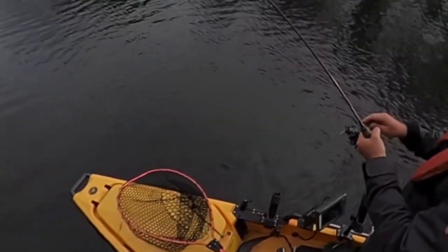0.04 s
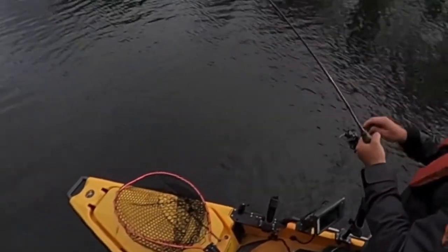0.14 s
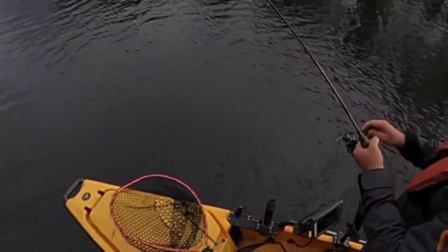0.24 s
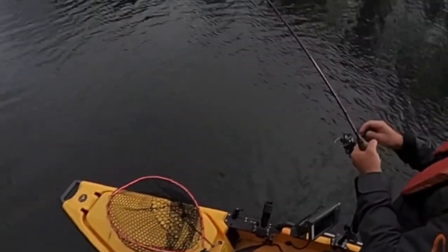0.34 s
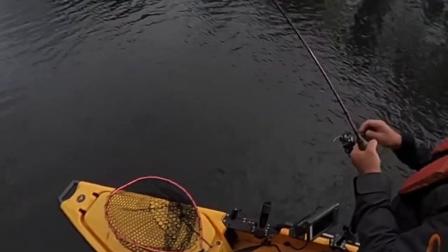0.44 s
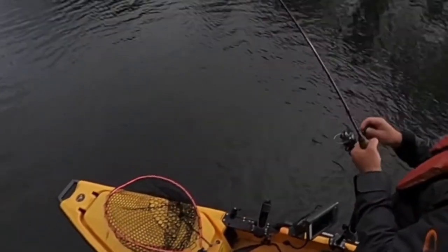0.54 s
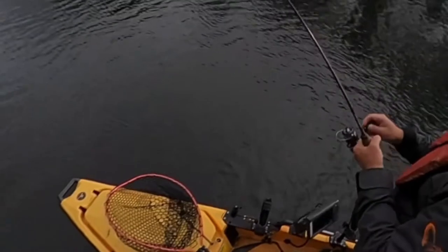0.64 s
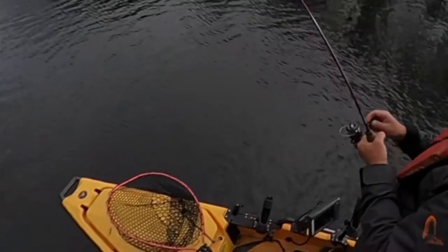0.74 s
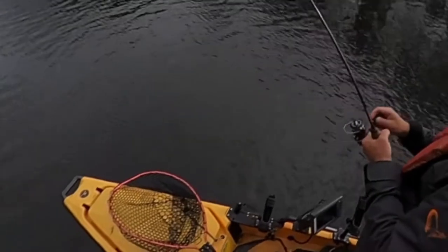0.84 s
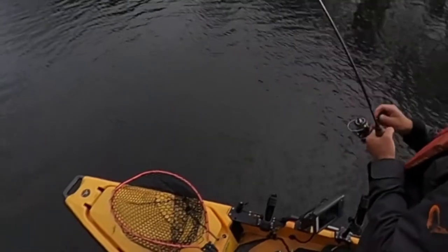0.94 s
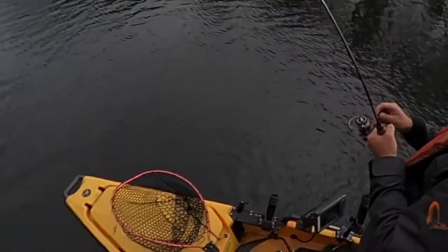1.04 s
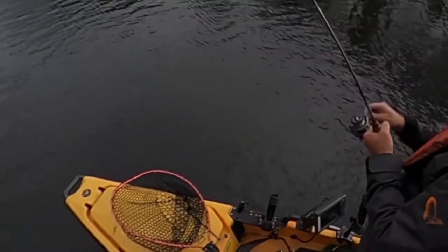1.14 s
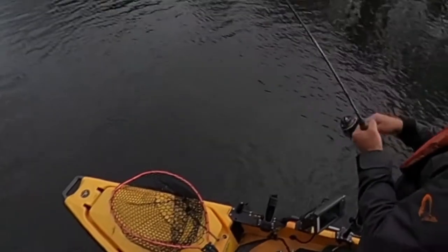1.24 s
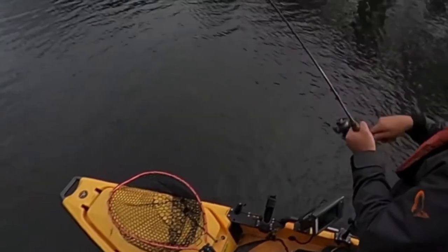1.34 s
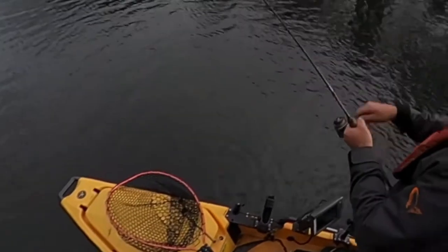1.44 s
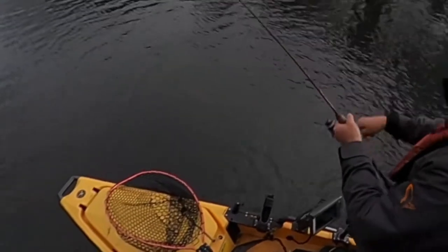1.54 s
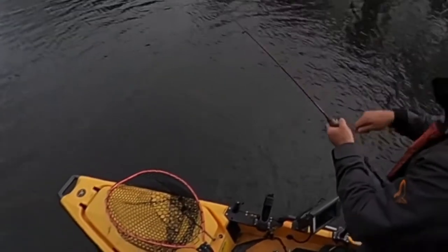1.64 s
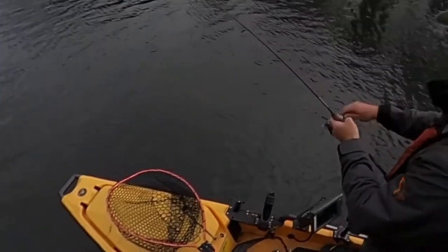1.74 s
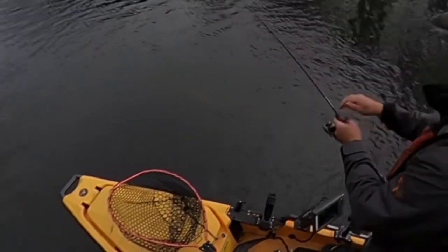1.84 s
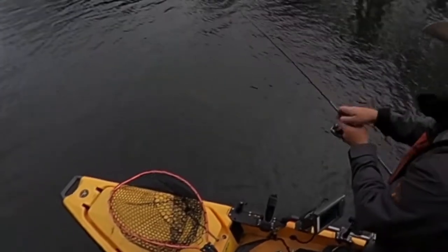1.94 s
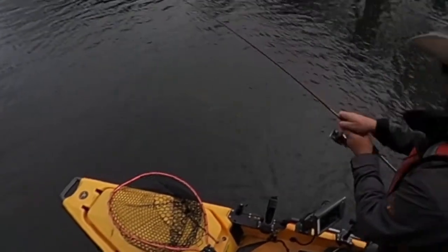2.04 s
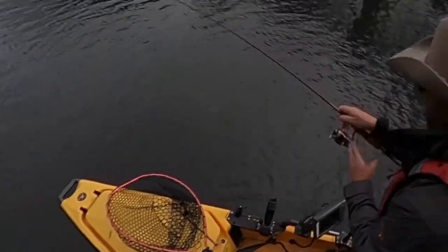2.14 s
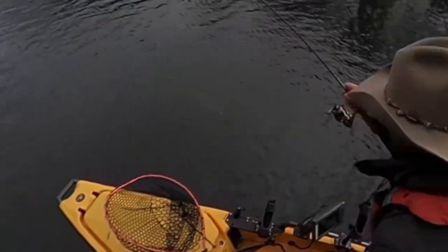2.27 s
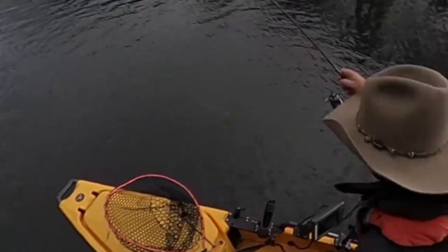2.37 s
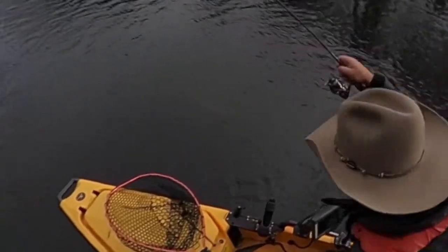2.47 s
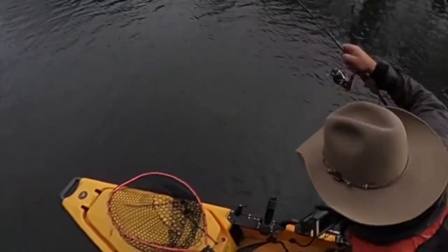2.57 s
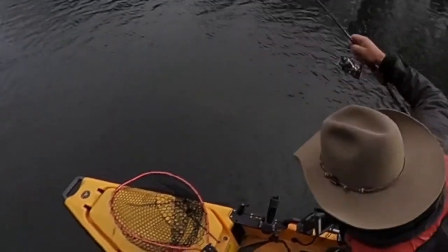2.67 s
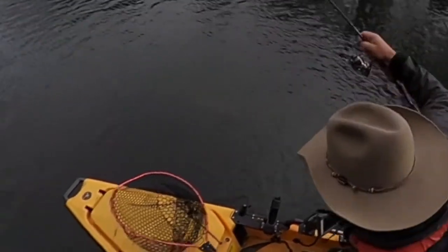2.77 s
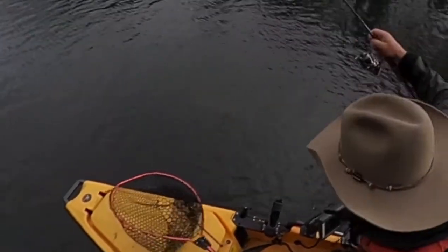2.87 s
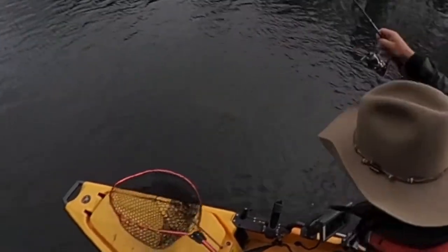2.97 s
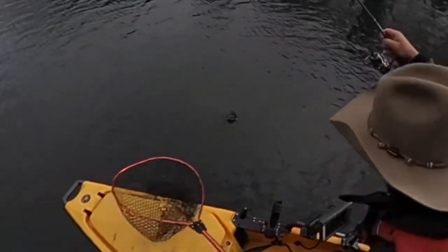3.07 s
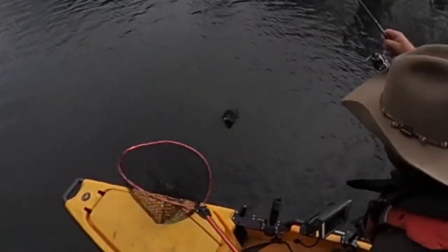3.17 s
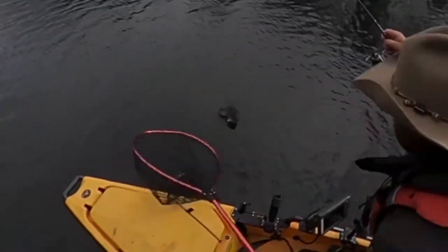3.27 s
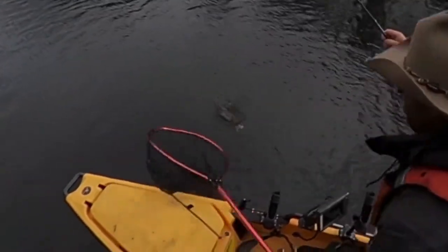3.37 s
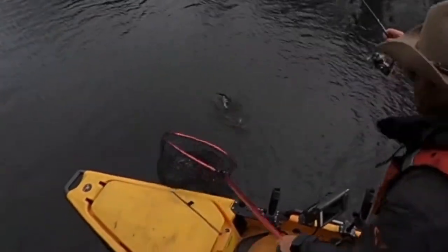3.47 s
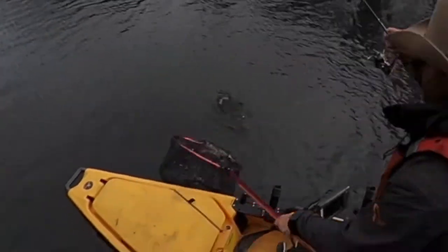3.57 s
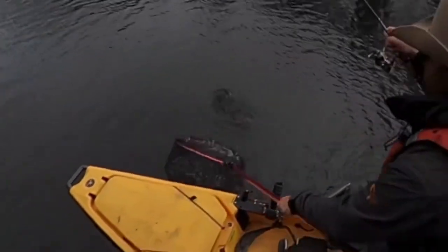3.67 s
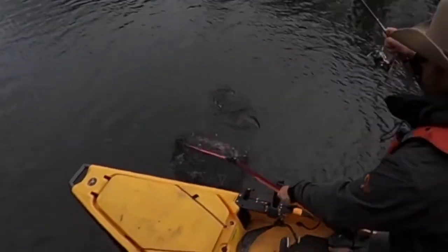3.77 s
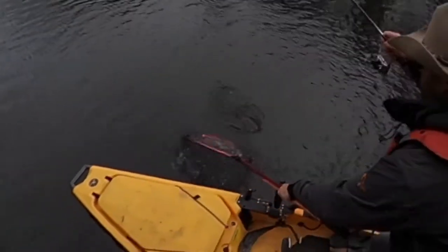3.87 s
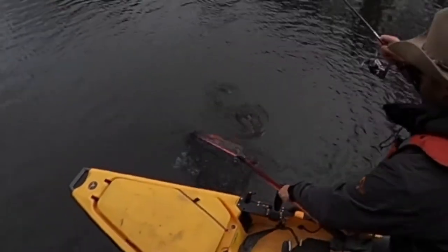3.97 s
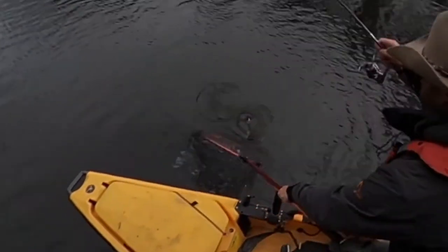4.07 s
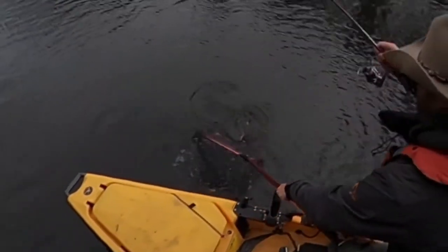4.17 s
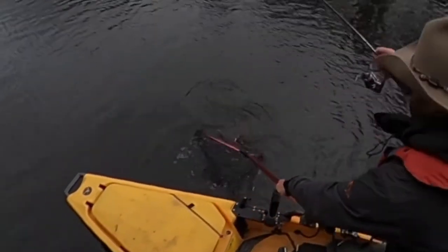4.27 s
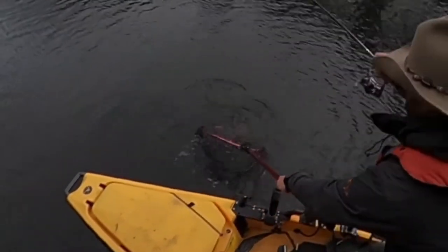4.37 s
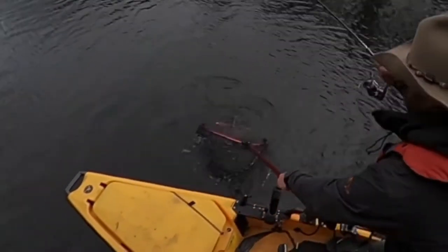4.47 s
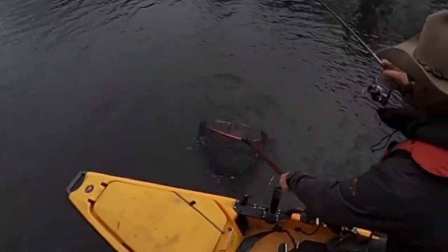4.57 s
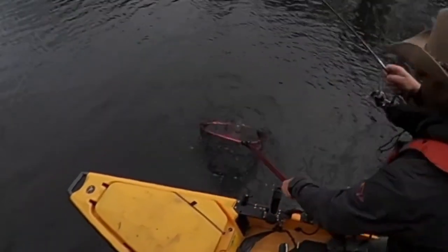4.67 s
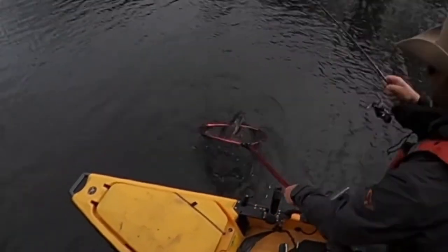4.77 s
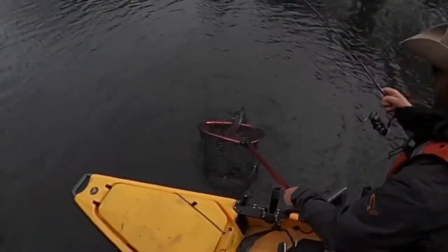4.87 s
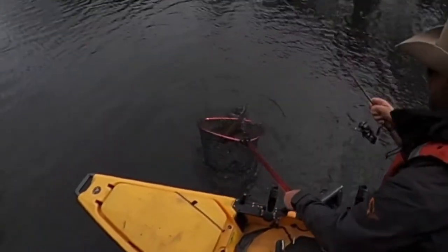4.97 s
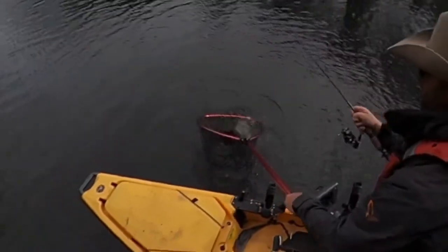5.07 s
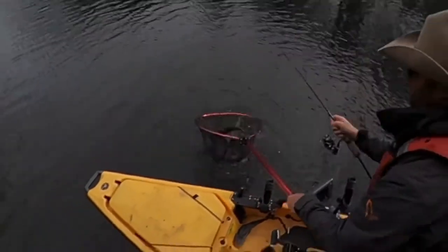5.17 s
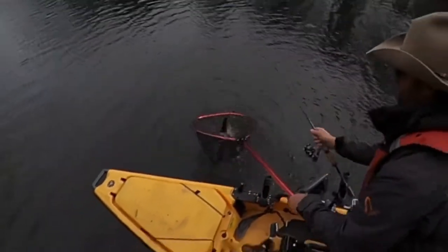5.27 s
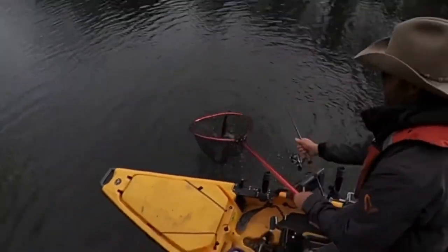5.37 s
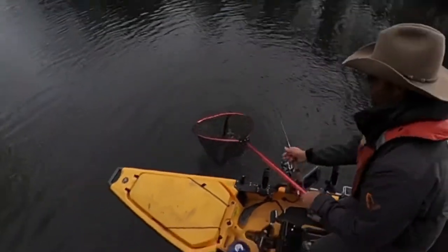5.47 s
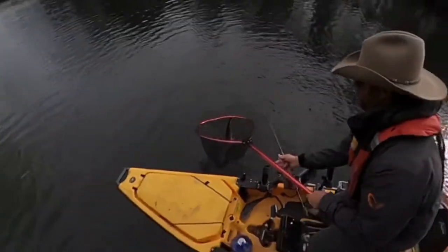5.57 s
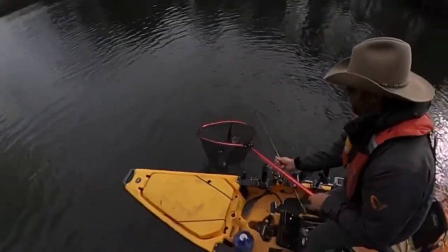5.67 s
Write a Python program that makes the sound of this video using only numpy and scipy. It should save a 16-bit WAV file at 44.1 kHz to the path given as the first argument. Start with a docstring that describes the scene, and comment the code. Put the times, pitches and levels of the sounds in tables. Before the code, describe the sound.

Quiet low rumble and faint reel ticks on calm water, then hollow hull knocks, wet splashes and dripping as a fish is netted from a kayak.

```python
"""On calm open water, an angler in a plastic kayak lands a fish. Knocks, mostly of the landing net on the
hollow hull, ring as fading tones and noise bursts, among low soft booms, bumps and gulps.
Splashes and drips are swarms of ringing air bubbles. The reel ticks with tiny noise bursts, and the taut
line sings in thin bands of noise. Air and the rocking boat rumble in a microphone mounted on the kayak."""
import sys
import numpy as np
from scipy import signal
from scipy.fft import rfft, irfft, next_fast_len
from scipy.io import wavfile
from scipy.ndimage import uniform_filter1d, map_coordinates

SR = 44100
rng = np.random.default_rng(int(sys.argv[2]) if len(sys.argv) > 2 else 0)


def unload_audio(sound):
    """Save the sound as a 16-bit wav file, at the path given as the first command line argument."""
    columns = np.transpose(np.atleast_2d(sound))
    # keep every value between -1 and 1, then stretch to whole-number steps
    steps = np.round(np.clip(columns, -1, 1) * 32767)
    wavfile.write(sys.argv[1], SR, steps.astype(np.int16))


N = 252252  # length in samples


def amp(db):
    """Turn decibels into a gain."""
    return 10 ** (np.asarray(db) / 20)


def unit(x):
    """Scale a sound to an rms (average strength) of 1."""
    return x / np.sqrt(np.mean(x ** 2) + 1e-20)


def clock(length):
    """Sample times over a length in seconds."""
    return np.arange(int(length * SR)) / SR


def curves(rows):
    """Join table rows with straight lines: one curve for each column after the time."""
    s, *columns = np.transpose(rows)
    return [np.interp(np.arange(N) / SR, s, column) for column in columns]


def wobble(rate):
    """A smooth random curve through a given number of random points a second."""
    points = rng.standard_normal(int(N * rate / SR) + 4)
    return map_coordinates(points, [np.arange(N) * rate / SR])


def add(track, s, sound):
    """Mix a sound into a track from time s."""
    start = int(np.clip(round(s * SR), 0, N - 1))
    track[start:start + len(sound)] += sound[:N - start]


def swell(s, rise_s, t60):
    """An envelope that grows to 1 at time s, then falls 60 dB in t60 seconds."""
    t = np.arange(N) / SR - s
    return np.exp(np.minimum(t, 0) / rise_s) * amp(-60 * np.maximum(t, 0) / t60)


def colour(x, points):
    """Filter a sound to follow (Hz, dB) points, without any sound before its start."""
    size = 2 * next_fast_len(len(x) // 2 + 4096)
    hz, db = np.transpose(points)
    gain = amp(np.interp(np.log(np.fft.rfftfreq(size, 1 / SR) + 1), np.log(hz), db))
    # Folding the cepstrum gives the filter minimum phase: it acts as early as it can.
    cepstrum = irfft(np.log(gain + 1e-6))
    cepstrum[1:size // 2] *= 2
    cepstrum[size // 2 + 1:] = 0
    response = np.exp(rfft(cepstrum))
    return irfft(rfft(x, size) * response)[:len(x)]


def noise(points):
    """Steady coloured noise of rms 1."""
    return unit(colour(rng.standard_normal(N), points))


def narrow(hz, width_hz):
    """A band of noise round a moving centre, rms 1."""
    phase = 2 * np.pi * np.cumsum(hz) / SR
    return unit(wobble(width_hz) * np.cos(phase) + wobble(width_hz) * np.sin(phase))


def patchy(x, patchy_db):
    """Give a rush patches of random strength in time and pitch, rms 1."""
    z = signal.stft(x, nperseg=512)[2]
    field = uniform_filter1d(rng.standard_normal(z.shape), size=7, axis=0)  # smooth over pitch
    field = uniform_filter1d(field, size=6, axis=1)  # smooth over time
    patched = z * amp(patchy_db * unit(field))
    return unit(signal.istft(patched, nperseg=512)[1][:N])


def bubble(t, hz, cycles, rise):
    """A pocket of air rings and fades 60 dB in some cycles, its pitch rising as it nears the surface."""
    age = t * hz / cycles
    tone = np.sin(2 * np.pi * hz * t * (1 + rise * np.minimum(age, 2) / 2))
    return tone * amp(-60 * age) * (1 - np.exp(-t * hz))


def swarm(low_hz, high_hz, cycles, spread_db, count):
    """Many bubbles of random time, pitch and strength, rms 1."""
    when, pitch, size = rng.random((count, 3)).T[:, :, None]
    hz = low_hz * (high_hz / low_hz) ** pitch
    t = clock(cycles / low_hz)
    strength = amp(-spread_db * np.log(size + .02))  # a few bubbles stand out
    grains = strength * bubble(t, hz, cycles, rise=.25)
    places = (when * N).astype(int) + np.arange(len(t))
    return unit(np.bincount(places.ravel(), grains.ravel(), N)[:N])


def ring(modes, t, vary_db):
    """A struck part sounds its own fading tones at slightly random strengths, peak 1."""
    hz, db, t60 = np.transpose(modes)[:, :, None]
    chance = rng.standard_normal((len(modes), 2))
    strength = amp(db + vary_db * chance[:, :1] - 60 * t / t60)
    x = np.sum(strength * np.sin(2 * np.pi * hz * t + 2 * chance[:, 1:]), 0)
    x *= 1 - np.exp(-2 * t * hz.mean())  # soften the first instant
    return x / np.abs(x).max()


# Tones of each struck part: (frequency [Hz], relative level [dB], time to fade 60 dB [s])
HULL_TONES = [(155, -17, 0.18), (211, -9.5, 0.55), (270, -13, 0.2), (354.5, 0, 0.21), (430, -19, 0.19),
              (575, 3.5, 0.093), (720, -3.5, 0.092)]
DECK_TONES = [(794, -0.5, 0.029), (937, -10, 0.13), (1022, 4.5, 0.067), (1120, 8, 0.026), (1318, -6, 0.073),
              (1900, -20, 0.048), (2150, -17.5, 0.034)]
FRAME_TONES = [(1550, -6, .025), (1800, -6, .025), (2350, -3, .02), (2650, -4, .007), (3185, -4, .018),
               (3950, -13, .02), (5360, 1, .02), (5500, 2.5, .005), (6280, -7, .015)]
# Colour of a hard contact: (frequency [Hz], relative level [dB])
CRACK_COLOUR = [(150, -18), (600, -40.5), (2500, 9), (5500, 0.5), (7500, -0.5), (10000, -16.5),
                (15000, -53.5)]
# Knocks on the kayak, and one light high click of reel or rod at 1.98 s, by how hard each set of tones
# is rung: (time [s], hull relative level [dB], deck relative level [dB], frame relative level [dB])
KNOCKS = [(1.98, -71, -84, -45), (2.889, -41, -23.5, -40), (2.8953, -68, -35, -58),
          (3.0068, -40, -22.5, -40), (3.423, -30, -31.5, -48), (3.994, -28, -30, -17),
          (4.013, -33, -44, -26.5), (4.738, -46, -57, -49)]


def knocks():
    """Knocks on the kayak and one light click: a hard crack with ringing frame, deck and hull tones."""
    out, t = np.zeros(N), clock(.5)
    clatter_colour = [(300, 8.5), (1250, 7.5), (3000, -5.0), (6000, -29.5), (14000, -68)]
    thud_colour = [(80, -12), (200, -6), (400, -4), (800, -13), (2000, -50), (6000, -110)]
    for s, hull_db, deck_db, frame_db in KNOCKS:
        # a sharp burst with a weaker, longer tail
        contact = rng.standard_normal(len(t)) * (amp(-60 * t / 0.0047) + amp(-11 - 60 * t / 0.04))
        frame = 0.85 * ring(FRAME_TONES, t, vary_db=1.5) + 0.85 * colour(contact, CRACK_COLOUR)
        rattle = rng.standard_normal(len(t)) * (amp(-60 * t / 0.043) + amp(-21.5 - 60 * t / .5))
        deck = .75 * ring(DECK_TONES, t, vary_db=1.5) + .6 * colour(rattle, clatter_colour)
        thud = colour(rng.standard_normal(len(t)) * amp(-60 * t / .2), thud_colour)
        hull = ring(HULL_TONES, t, vary_db=1.5) + 1.1 * thud
        add(out, s, amp(hull_db) * hull + amp(deck_db) * deck + amp(frame_db) * frame)
    return out


SWELL_S = 0.012  # width of the smooth rise before each crest
# Low soft booms that swell and fade:
# (time of the crest [s], level [dB], frequency [Hz], time to fade 60 dB [s])
BOOMS = [(1.091, -39.5, 39, 0.13), (2.085, -35.5, 49, .19), (2.668, -18, 44, 0.055),
         (2.766, -33, 95.5, 0.095), (2.838, -29, 84.4, 0.11), (2.913, -33, 88.1, 1),
         (3.053, -19.5, 70, 0.3), (3.411, -25.5, 115.7, 0.27), (3.445, -24, 113.7, .16),
         (4.028, -24, 64.6, 0.36), (4.803, -38, 78, 0.3), (5.214, -34, 29.3, 1)]


def booms():
    """Low soft booms: each is one deep tone that swells to a crest and fades."""
    out = np.zeros(N)
    for s, db, hz, t60 in BOOMS:
        t = clock(1) - .2  # the crest is at 0
        rise = np.exp(-(t / SWELL_S) ** 2 / 2)
        fall = amp(-60 * (np.hypot(t, .005) - .005) / t60)  # rounded at the crest
        shape = np.where(t < 0, rise, fall)
        add(out, s + t[0], amp(db) * shape * np.cos(2 * np.pi * hz * t))
    return out


# Soft low bumps and gulps at the hull: (time [s], relative level [dB], middle frequency [Hz])
BUMPS_AND_GULPS = [(.936, -51.5, 586), (2.079, -46, 213), (2.32, -38.5, 501), (2.591, -33, 222),
                   (2.79, -41, 271), (2.9, -26, 212), (3.05, -38, 223), (3.382, -33, 274),
                   (3.434, -28.5, 262), (3.495, -30.5, 1120), (3.885, -41, 650), (4.035, -36.5, 467),
                   (4.683, -37, 249), (4.735, -34, 418), (4.768, -41, 247), (4.94, -45, 580),
                   (5.134, -36.5, 339), (5.521, -42, 196)]


def bumps_and_gulps():
    """Soft low bumps and gulps at the hull: a dull noise burst with a cluster of short low tones."""
    out, t = np.zeros(N), clock(.2)
    for s, db, hz in BUMPS_AND_GULPS:
        push = rng.standard_normal(len(t)) * (1 - np.exp(-t / 0.0035)) * amp(-60 * t / 0.063)
        dull_colour = [(hz / 4, -14), (hz / 2.8, -3), (hz, 0), (hz * 1.33, -9), (hz * 4, -45),
                       (hz * 12, -100)]
        burst = colour(push, dull_colour)
        add(out, s, 0.44 * amp(db) * burst / np.abs(burst).max())
        for k, (delay, pitch) in enumerate(rng.random((4, 2))):  # each tone is weaker than the last
            tone = bubble(t, hz * 1.5 ** (pitch - .5), cycles=23.0, rise=0.022)
            add(out, s + .009 * k * (1 + delay / 2), amp(db - 3.5 - 2.66 * k) * tone)
    return out


# Colours of fine spray and coarser slosh: (frequency [Hz], relative level [dB])
SPRAY_COLOUR = [(880, -19.5), (1500, -2), (2050, 2), (2830, 1), (3760, -2), (5150, 2), (8000, -0.5),
                (10700, -17.5), (14400, -26), (15600, -26)]
SLOSH_COLOUR = [(150, 5.5), (350, -6.5), (700, -4.5), (1300, 6), (1800, 1), (2600, -17), (5000, -73)]
# Surges of thrown water: (time of the crest [s], spray relative level [dB], slosh relative level [dB],
# mist level relative to the spray column [dB], rise time [s], time to fade 60 dB [s])
SURGES = [(3.514, -43, -44.5, -35, 0.015, 0.99), (3.604, -39.5, -40.5, -27, 0.077, 0.24),
          (3.689, -41, -35.5, -31, 0.029, 0.33), (3.89, -66, -56.5, -32, 0.023, 0.16),
          (4.929, -57.5, -52, -22, 0.036, 0.63), (5.112, -42.5, -42.5, -6, 0.0051, 0.13),
          (5.138, -41, -41.5, -14, 0.027, 0.39), (5.27, -51, -55.5, -17, 0.081, 0.95),
          (5.505, -53.5, -62, -18, 0.12, 0.52), (5.654, -48, -54, -30, 0.048, 0.36),
          (5.696, -48, -73, -11, .008, 0.11)]


def splashes():
    """Thrown water: mist, spray and slosh, made of bubbles, with a torn rush in spray and slosh."""
    power = np.zeros((3, N))
    for s, spray_db, slosh_db, mist_db, rise_s, t60 in SURGES:
        levels = amp([spray_db + mist_db, spray_db, slosh_db])
        power += np.outer(levels, swell(s, rise_s, t60)) ** 2
    mist_gain, spray_gain, slosh_gain = np.sqrt(power)

    fizz = swarm(1500, 12000, cycles=7, spread_db=5.5, count=16000)
    beads = swarm(1600, 7000, cycles=30, spread_db=6.5, count=2600)
    spray = unit(colour(fizz + .7 * beads + .5 * rng.standard_normal(N), SPRAY_COLOUR))

    specks = swarm(6000, 15000, cycles=5, spread_db=6, count=6000)
    mist = unit(colour(specks, [(4000, -20), (8000, 0), (11000, -8), (15500, -22)]))

    pockets = swarm(330, 2000, cycles=22, spread_db=3.5, count=3000)
    slosh = unit(colour(pockets + 1.5 * rng.standard_normal(N), SLOSH_COLOUR))

    tearing = amp(0.43 * wobble(90))  # sheets of water land unevenly
    return tearing * (mist_gain * mist + amp(-1) * spray_gain * spray + amp(-2.5) * slosh_gain * slosh)


# Showers of small drips and bubbles: (start time [s], end time [s], drips per second [1/s],
# middle relative level [dB], first frequency [Hz], last frequency [Hz])
SHOWERS = [(3.496, 3.741, 70, -44, 2200, 802), (3.778, 3.925, 41, -54.5, 1950, 606),
           (4.099, 4.65, 8.2, -51, 5430, 5640), (4.87, 4.983, 65, -48, 2160, 767),
           (5.2, 5.7, 20, -44.5, 1565, 1504)]
# life of each bubble, and full width of the random spread
DRIP_CYCLES, DRIP_SPREAD_OCTAVES, DRIP_SPREAD_DB = 45, .6, 7


def drips():
    """Small drops fall at uneven intervals, their pitch drifting: rows like those of the single drops."""
    rows = []
    for start, end, rate, db, first_hz, last_hz in SHOWERS:
        times = np.arange(start, end, 1 / rate)
        for s, (late, size, pitch) in zip(times, rng.random((len(times), 3))):
            middle_hz = first_hz * (last_hz / first_hz) ** ((s - start) / (end - start))
            hz = middle_hz * 2 ** (DRIP_SPREAD_OCTAVES * (pitch - .5))
            level_db = db + DRIP_SPREAD_DB * (size - .5)
            rows.append((s + late / rate, level_db, hz, DRIP_CYCLES))
    return rows


# Single drops, loud and faint:
# (time [s], relative level [dB], frequency [Hz], life [cycles to fade 60 dB])
DROPS = [(3.48, -34.5, 2380, 14), (3.561, -33, 5100, 38), (3.606, -20.5, 2100, 8.6), (4.422, -36, 2610, 22),
         (4.502, -51, 5330, 180), (4.885, -36.5, 5400, 38), (4.902, -44.5, 1780, 155),
         (4.924, -34, 2255, 14), (5.123, -31, 1354, 22.4), (5.143, -24.5, 1230, 9.2),
         (5.175, -30, 1030, 16), (5.208, -21, 3850, 9.4), (5.217, -36.5, 1200, 66), (5.232, -27, 2930, 16),
         (5.279, -30.5, 5350, 21), (5.306, -33.5, 2210, 30), (5.426, -30, 3660, 14.6),
         (5.453, -38.5, 1440, 19), (5.484, -32, 1332, 15), (5.492, -31.5, 2170, 16), (5.503, -28, 1625, 23),
         (5.6256, -26, 1140, 9), (5.65, -27, 3490, 19), (5.694, -34, 2303, 53), (5.694, -34, 1430, 43)]


def drops():
    """A drop ticks on the surface, traps one bubble and scatters weaker ones."""
    out, t = np.zeros(N), clock(.08)
    for s, db, hz, cycles in DROPS + drips():
        tick = colour(rng.standard_normal(len(t)) * amp(-60 * t / 0.027), CRACK_COLOUR)
        add(out, s, amp(db) * (1.23 * bubble(t, hz, cycles, rise=0.027) + 0.16 * tick))
        for delay, pitch in rng.random((3, 2)):
            weaker = bubble(t, hz * 2 ** (pitch - .5), cycles=27, rise=0.32)
            add(out, s + 0.016 * (delay - .3), amp(db - 10) * weaker)
    return out


# The fish takes line: (start time [s], fastest time [s], end time [s],
# top click rate [1/s], relative level at the top rate [dB])
RUNS = [(1.109, 1.176, 1.385, 142, -59), (1.411, 1.572, 1.66, 77, -57), (1.776, 1.815, 1.84, 70, -56)]
CREEP_PER_S = 35  # click rate at both ends of a run
CLICK_DB_PER_DOUBLING, CLICK_SCATTER_DB = 1, 0.5  # faster is louder; random spread


def pawl_clicks():
    """In each run the spool speeds up and slows again, one click a tooth: rows (s, dB)."""
    rows = []
    for start, fastest, end, top_rate, db in RUNS:
        t = start + clock(end - start)
        rate = 2 ** np.interp(t, [start, fastest, end], np.log2([CREEP_PER_S, top_rate, CREEP_PER_S]))
        teeth_passed = np.floor(np.cumsum(rate) / SR)
        teeth = np.flatnonzero(np.diff(teeth_passed, prepend=-1))
        level = db + CLICK_DB_PER_DOUBLING * np.log2(rate[teeth] / top_rate)
        rows += zip(t[teeth], level + CLICK_SCATTER_DB * rng.standard_normal(len(teeth)))
    return rows


# Colour of a click of the pawl, the catch on the teeth: (frequency [Hz], relative level [dB])
PAWL_COLOUR = [(800, 4), (2000, -2), (3200, 5.5), (4400, -44.5), (5900, 10), (7000, -9), (8500, -9.5),
               (10200, -10.5), (11300, -10), (12800, 0.5), (14200, -24), (15800, -6)]
# The drag slips by one tooth: (time [s], relative level [dB])
SLIPS = [(0.154, -64.5), (1.006, -61.5), (1.726, -59), (2.017, -58), (2.591, -50.5), (2.673, -50.5),
         (2.747, -52), (2.962, -51), (4.285, -50), (4.541, -55), (4.761, -54)]


def reel():
    """The fish takes line and the drag's pawl snaps over its teeth: short bursts of coloured noise."""
    out, t = np.zeros(N), clock(.05)
    for s, db in SLIPS + pawl_clicks():
        snap = amp(-60 * t / .006) + amp(-14 - 60 * t / .055)  # sharp start, weaker tail
        add(out, s, amp(db) * rng.standard_normal(len(t)) * snap)
    return 1.46 * colour(out, PAWL_COLOUR)


# The taut line catches in a guide and sings:
# (time [s], frequency [Hz], relative level [dB], time to fade 60 dB [s])
WHISTLES = [(.225, 4880, -86.5, 2.6), (.55, 5310, -84, 2.8), (1.012, 5670, -75, 1.84),
            (1.78, 5770, -66.5, 0.6), (1.92, 5940, -66.5, 0.72), (2.02, 6150, -71.5, 2.6),
            (2.69, 6200, -67.5, 0.89), (2.915, 6220, -67, .35), (3.11, 6040, -62, .6)]
WHISTLE_ATTACK_S = 0.0054
# The loaded reel squeals faintly: (time [s], middle frequency [Hz], middle level [dB])
SQUEAL = [(.52, 1620, -92), (.61, 1524, -74.5), (.69, 1425, -73), (.76, 1590, -82.5), (1.05, 1560, -90),
          (1.1, 3220, -108), (1.2, 3320, -80), (1.52, 3310, -77), (1.75, 3350, -86)]
# The line's breathy hiss: (time [s], centre frequency [Hz], middle level [dB])
HISS = [(.3, 7600, -93.5), (1, 6980, -100), (1.2, 6300, -97), (1.65, 6570, -99), (1.85, 7500, -78.5),
        (3.2, 7200, -71), (3.9, 5860, -65), (4.3, 5920, -65), (5, 7120, -65.5)]


def line():
    """The taut line sings in the rod's guides and hisses, and the reel squeals: moving bands of noise."""
    pitch_hz, gain = np.full(N, float(WHISTLES[0][1])), np.zeros(N)
    for s, hz, db, t60 in WHISTLES:
        note = amp(db) * swell(s, WHISTLE_ATTACK_S, t60)
        pitch_hz = np.where(note > gain, hz, pitch_hz)  # the strongest note sets the pitch
        gain = np.maximum(note, gain)
    whistle = gain * amp(-2.0 + 4 * wobble(35.33)) * narrow(pitch_hz, width_hz=130)

    squeal_hz, squeal_db = curves(SQUEAL)
    squeal_band = narrow(squeal_hz + 50 * wobble(25), width_hz=260)
    squeal = amp(squeal_db + 2 * wobble(40)) * squeal_band

    centre_hz, hiss_db = curves(HISS)
    hiss = patchy(narrow(centre_hz, width_hz=1650), patchy_db=3.5)
    return whistle + squeal + amp(hiss_db + wobble(31)) * hiss


# The boat lurches as the angler moves: (time of the crest [s], relative rumble level [dB])
LURCHES = [(0.119, -41), (.44, -42), (1.09, -45), (2.08, -38), (2.44, -35), (2.68, -33.5), (2.791, -31),
           (2.92, -27), (3.08, -25.5), (3.44, -24.5), (3.66, -33.5), (4.03, -25.5), (4.279, -36.5),
           (4.529, -40), (4.79, -35.5), (5.23, -34), (5.7, -43.5)]
LURCH_RISE_DB_PER_S, LURCH_FALL_DB_PER_S = 93, 96
AIR_DB = -50  # lowest value of the rocking curve, while the boat lies still


def rocking():
    """A rumble curve in dB: each lurch builds and settles over the steady air."""
    s, db = np.transpose(LURCHES)[:, :, None]
    t = np.arange(N) / SR - s
    lurch_db = db + np.minimum(LURCH_RISE_DB_PER_S * t, -LURCH_FALL_DB_PER_S * t)
    return np.maximum(lurch_db.max(axis=0), AIR_DB)


# Colours of the rumble, the drumming hull, the rippling water and the steady floor:
# (frequency [Hz], relative level [dB])
RUMBLE_COLOUR = [(8.8, -27.5), (15, 8), (36, -2.5), (59, -6.5), (97, -14), (146, -28), (241, -60),
                 (363, -44), (503, -44), (617, -45.5), (900, -45.5), (1170, -66.5), (1980, -120)]
DRUMMING_COLOUR = [(25, -26.5), (70, 6), (110, -1.5), (165, -10.5), (220, -14), (330, -22.5), (700, -37),
                   (2000, -100)]
RIPPLE_COLOUR = [(120, -3.5), (200, 5), (372, -5), (497, -6), (907, -10), (1090, -1.5), (1600, -3.5),
                 (4120, -12), (5820, -10), (7650, -14), (11200, -34.5), (12300, -33.5), (15600, -75)]
FLOOR_COLOUR = [(100, 15), (400, -25.5), (1000, -7), (6000, -33.5), (10000, -30.5), (16000, -18)]
# Soft rush of rippling water and clothing: (time [s], relative level [dB])
RUSTLE = [(0.0, -84), (0.53, -88), (0.76, -82), (1.08, -81), (1.45, -69.5), (2.17, -66), (2.41, -58.5),
          (2.7, -67), (3.3, -65.5), (3.9, -64.5), (4.51, -68), (4.85, -63)]
RUSTLE_GAIN_DB = 1.5  # added to the rush levels


def surroundings():
    """Low rumble of air and boat, a soft rustling rush with tiny water ticks, and a faint steady floor."""
    rocking_db = rocking()
    deep = unit(colour(noise(RUMBLE_COLOUR), [(40, 0.0), (80, -0.5), (400, -6.0)]))
    rumble = amp(rocking_db - 1.5) * deep
    # harder rocking drums the hollow hull
    drumming = amp(1.462 * rocking_db + 3.5) * noise(DRUMMING_COLOUR)
    trickle = swarm(2200, 6500, cycles=40, spread_db=4, count=170)
    water = patchy(noise(RIPPLE_COLOUR), patchy_db=3.0) + 0.2 * trickle
    flutter_db = 1.1 * wobble(25)
    rush = amp(curves(RUSTLE)[0] + RUSTLE_GAIN_DB + flutter_db) * water
    return rumble + drumming + rush + amp(-85.5) * noise(FLOOR_COLOUR)


def scene():
    """Add up all the sounds, close by on open water, with no echo."""
    boat = knocks() + booms() + bumps_and_gulps()
    water = splashes() + drops()
    tackle = reel() + line()
    return (boat + water + tackle + surroundings())[None]


TOP_HZ = 15800  # band limit


def record(dry):
    """Remove everything at or above the band limit."""
    size = next_fast_len(N + SR // 2)
    keep = np.fft.rfftfreq(size, 1 / SR) < TOP_HZ
    return irfft(rfft(dry, size) * keep, size)[:, :N]


dry = scene()
out = record(dry)
unload_audio(out)
```